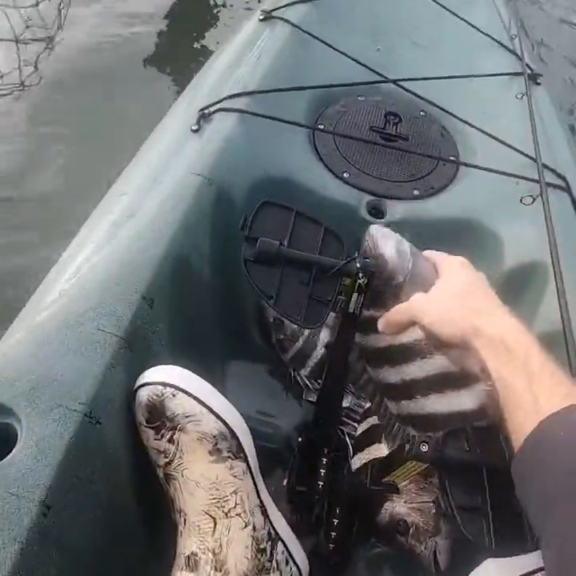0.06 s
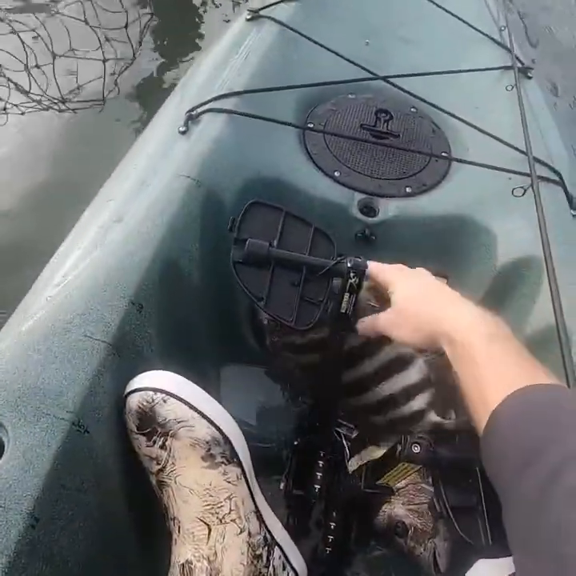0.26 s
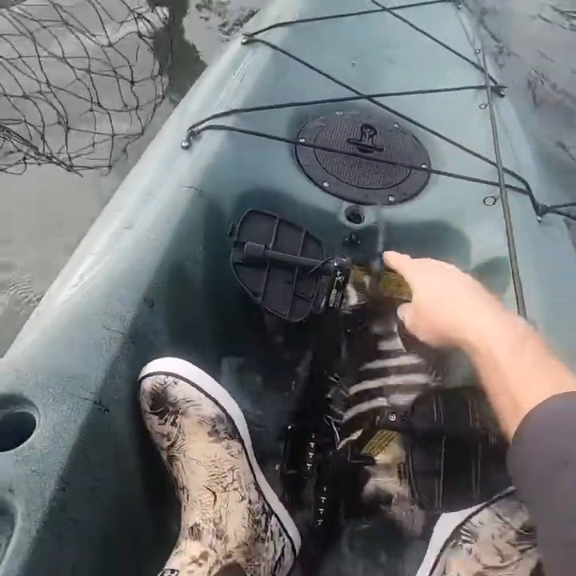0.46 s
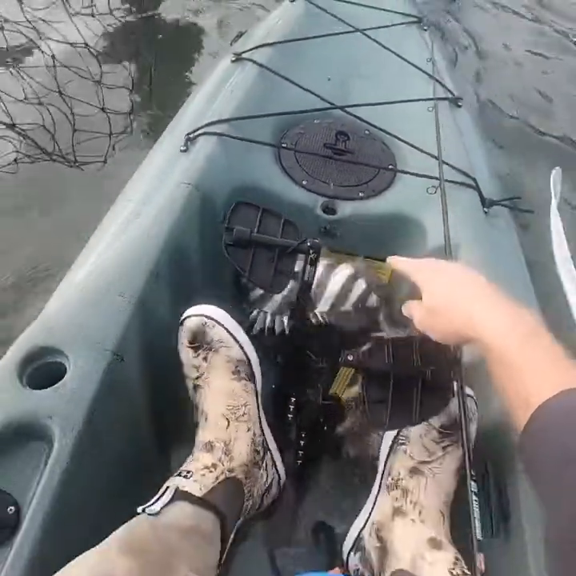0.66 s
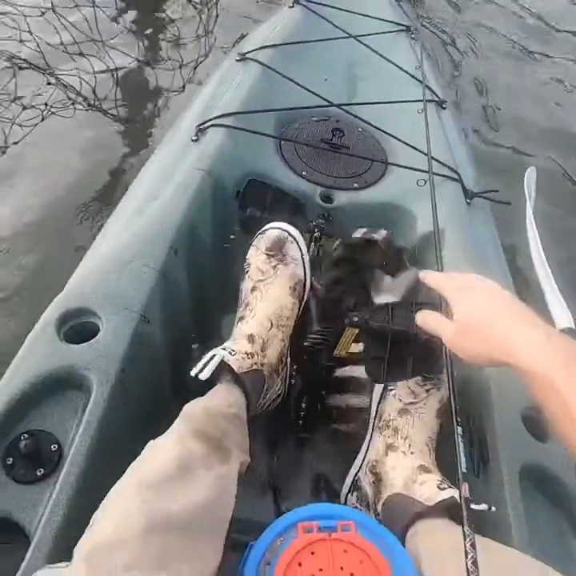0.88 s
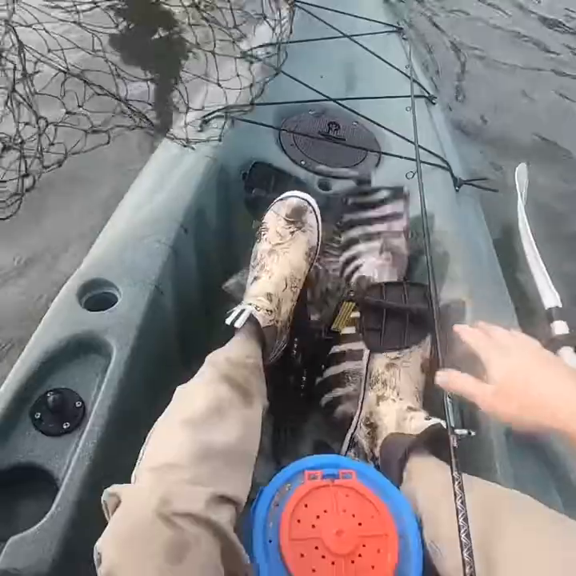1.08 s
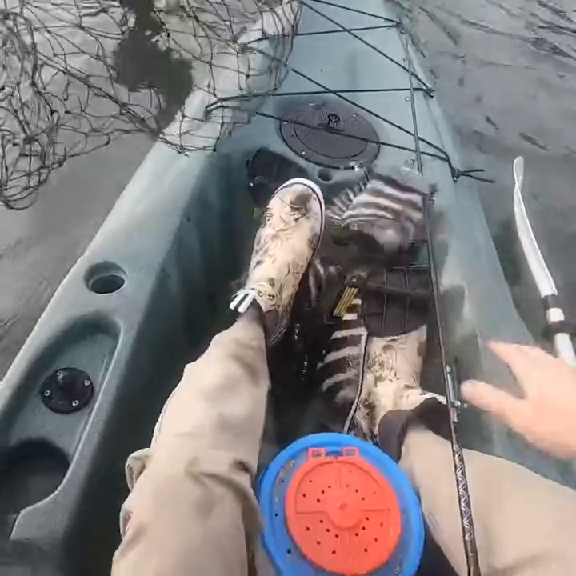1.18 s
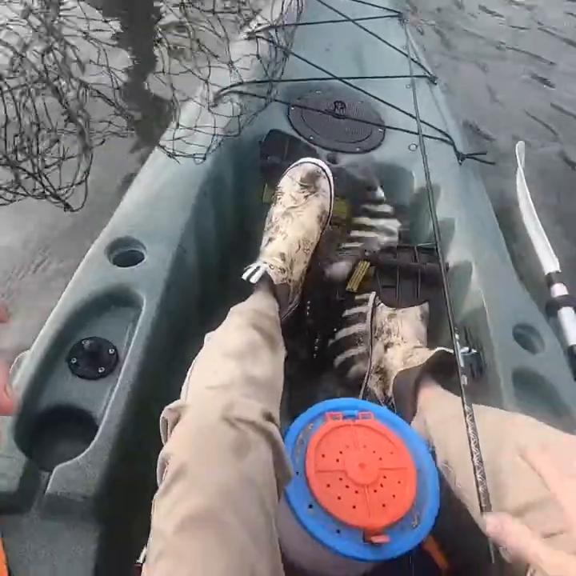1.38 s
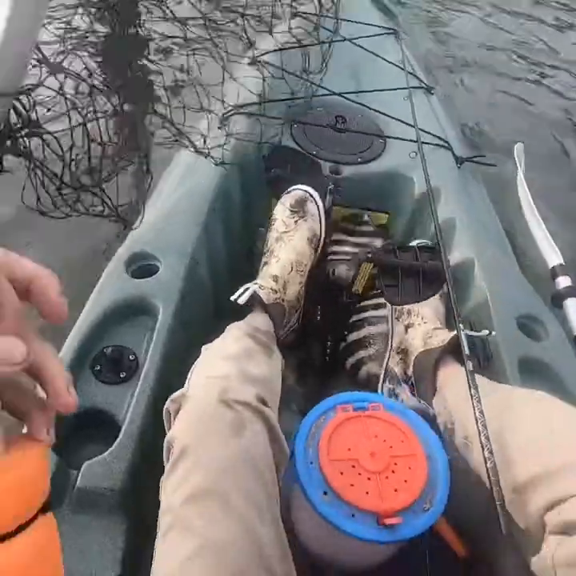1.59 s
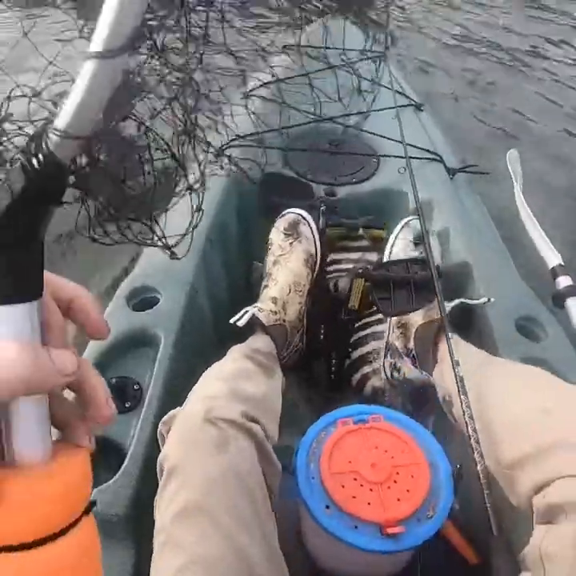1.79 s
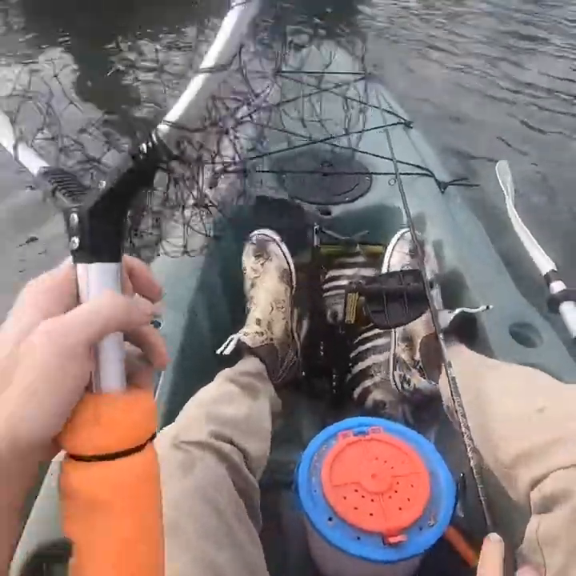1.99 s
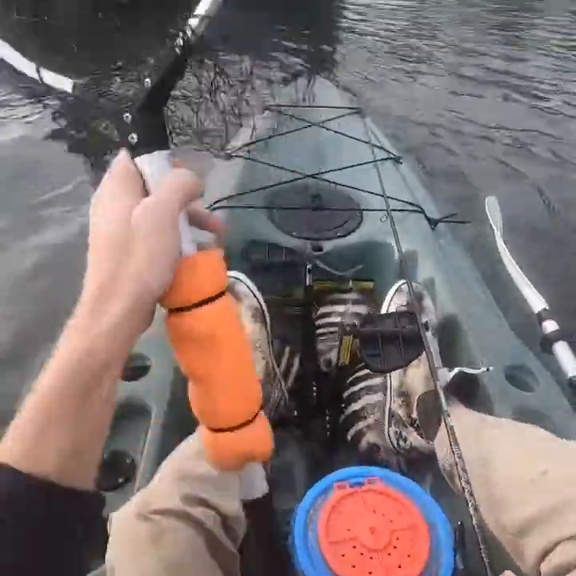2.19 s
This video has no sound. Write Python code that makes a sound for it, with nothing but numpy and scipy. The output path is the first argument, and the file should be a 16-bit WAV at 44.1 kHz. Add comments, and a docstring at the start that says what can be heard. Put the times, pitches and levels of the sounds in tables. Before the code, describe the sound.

Fish thrashing in a plastic kayak footwell, dull hollow knocks and wet slapping, then near quiet

```python
"""Footwell of a hollow plastic kayak: a fish flaps under a chest-worn camera with two close microphones.
Thumps are short shudders that ring the hull modes; slaps of fins and tail are gritty coloured noise bursts.
Droplets pop as tones of a few cycles; dense random bumps and band-passed clicks make the rumble and wet rustle.
Filtered noise makes a light wind on the microphones and a soft hiss of open water."""
import sys
import numpy as np
from scipy import signal
from scipy.fft import rfft, irfft
from scipy.io import wavfile
from scipy.ndimage import uniform_filter1d

SR = 44100
rng = np.random.default_rng(int(sys.argv[2]) if len(sys.argv) > 2 else 0)


def undo_db(level):
    """Turn decibels back into plain size, where 20 dB means ten times bigger."""
    steps = np.asarray(level, float) / 20
    return 10 ** steps


def generate_wav(signal):
    """Clip the signal to [-1, 1] and save it as 16-bit WAV at the path in sys.argv[1]."""
    frames = np.transpose(np.atleast_2d(signal))
    scaled = np.clip(frames, -1, 1) * 32767
    pcm = np.round(scaled).astype(np.int16)
    wavfile.write(sys.argv[1], SR, pcm)


N = 99225


def unit(x):
    """Scale to rms 1."""
    return x / np.sqrt(np.mean(x ** 2))


def colour(x, points, count=1024):
    """Minimum-phase filter through (hz, db) points, built from the folded cepstrum."""
    hz, db = np.array(points, float).T
    grid_hz = np.fft.rfftfreq(2 * count, 1 / SR)
    grid_db = np.interp(np.log(grid_hz + 1), np.log(hz), db)
    cepstrum = irfft(np.log(undo_db(grid_db)))
    cepstrum[1:count] *= 2
    response = np.exp(rfft(cepstrum[:count], 2 * count))
    fade = np.hanning(2 * count)[count:]
    taps = irfft(response)[:count] * fade
    return signal.fftconvolve(x, taps)[:len(x)]


def resonate(x, hz, q):
    """A steep resonance: the same band-pass twice."""
    b, a = signal.iirpeak(hz, q, SR)
    return signal.lfilter(b, a, signal.lfilter(b, a, x))


def curve(table, index):
    """Gain along time from a dB column; column 0 is time in s."""
    rows = np.array(table, float)
    return undo_db(np.interp(np.arange(N) / SR, rows[:, 0], rows[:, index]))


def walk(rate_hz):
    """Random levels held 1 / rate_hz and slewed twice; spread near 1."""
    hold = int(SR / rate_hz)
    steps = np.repeat(rng.standard_normal(N // hold + 1), hold)
    return 1.3 * uniform_filter1d(uniform_filter1d(steps, hold), hold)[:N]


def grains(per_s, spread_db):
    """Random clicks of either sign, mostly small, a few large."""
    chance, sign, size = rng.random((3, N))
    level = undo_db(-spread_db * np.log(size + 1e-9))
    return (chance < per_s / SR) * np.sign(sign - .5) * level


def add(out, at_s, x):
    """Mix x into out from time at_s."""
    i = int(at_s * SR)
    out[i:i + len(x)] += x[:N - i]


def ring(centre_hz, octaves):
    """Impulse response of the hull: decaying modes, favoured near centre_hz by the struck spot."""
    # hull modes: mode_hz, level_db, t60_s
    hull_modes = [(88, -1, 0.24), (140, 5, 0.13), (174, 4.5, 0.11), (223.9, 5.5, 0.084), (279, 4, 0.053),
                  (339.5, 1, 0.082), (378.3, -4, 0.12), (503.4, -5.5, 0.067), (593.6, -2.5, 0.035),
                  (756, -5.5, 0.021)]
    t = np.arange(SR // 2) / SR
    hz, db, t60_s = np.array(hull_modes, float).T[:, :, None]
    wake = undo_db(db) * np.exp(-(np.log2(hz / centre_hz) / octaves) ** 2)
    decay = np.exp(-np.log(1000) * t / t60_s)
    return np.sum(wake * np.sin(2 * np.pi * hz * t) * decay, axis=0)


def thumps():
    """A soft body shudders against the shell while contact lasts; the modes ring on."""
    # thumps of the fish on the hull: start_s, peak_db (before the crack), shudder_hz, contact_s
    blows = [(0.22, -27.5, 192, 0.028), (.277, -2, 257.5, 0.012), (0.3, -18.5, 203, 0.017),
             (.351, -12.5, 224, 0.015), (0.427, -3.5, 398, 0.0053), (0.432, -5.5, 119, 0.0043),
             (0.523, -4, 162, 0.0072), (0.544, 0.5, 217.5, 0.007), (0.565, -15.5, 162, 0.023),
             (0.645, -19.5, 319, 0.018), (.72, -20, 146, 0.025), (0.781, -16.5, 302, 0.017),
             (0.834, -13, 176, 0.013), (.888, -2.5, 255, 0.0094), (0.907, -22.5, 392, 0.019),
             (.966, -3, 261, 0.0072), (0.976, -12, 140, 0.021), (1.226, -25.5, 397, 0.0089),
             (1.251, -19, 236, 0.017), (1.366, -2, 257, 0.0087), (1.418, -18.5, 764, 0.0038),
             (1.459, -11.5, 213, 0.0079), (1.431, -28.5, 483, 0.0091), (2.002, -25, 312, 0.0035),
             (1.565, -7.5, 263, 0.0068), (2.173, -25.5, 150, 0.0085)]
    struck_octaves = 0.83
    crack_hz, crack_octaves, crack_db = 640, 0.67, -11  # crack_db is relative to the blow
    out = np.zeros(N)
    # first hard touch wakes the upper modes
    crack = np.convolve(ring(crack_hz, crack_octaves), np.hanning(SR // 1500))
    for start_s, peak_db, hz, contact_s in blows:
        t = np.arange(0, max(contact_s, 1e-3), 1 / SR)
        push = np.cos(2 * np.pi * hz * t) * np.sin(np.pi * t / t[-1])
        thump = np.convolve(ring(hz, struck_octaves), push - push.mean())
        add(out, start_s, undo_db(peak_db) * thump / np.abs(thump).max())
        add(out, start_s, -undo_db(peak_db + crack_db) * crack / np.abs(crack).max())
    return out


def scratches():
    """Wet slaps: gritty broad bursts that swell and die, each with its own dull part and brightness."""
    # slaps of fins and tail: swell_end_s, peak_db, dull_db, treble_db
    slaps = [(.177, -38, -12, -28), (0.237, -13, 0, -16.5), (.256, -23.5, -15, -7), (.268, -16.5, -13, -12),
             (0.291, -16, -11.5, -9), (0.332, -15, 11, -36), (.356, -18, 25, -32), (.386, -25, -3, 4),
             (0.41, -23, -18, -1), (.43, -16.5, 8, -24), (.463, -15.5, -1, -12), (.476, -10.5, -2, -4.5),
             (0.498, -14, -23, 6), (0.516, -17.5, -17, -1), (0.543, -19.5, 3, -3), (0.566, -19.5, -10, -6),
             (0.609, -19, -17, -5.5), (.626, -15, -15, -10), (.648, -9.5, 6, -16), (.788, -18, 0.5, -23),
             (0.837, -24.5, -14, 6), (0.865, -24, -13, -8), (.891, -20, -11, -7), (.94, -25, -6, -15),
             (0.954, -27, -12, -2), (1.09, -24, 6.5, -44), (1.159, -29, -19, -11), (1.189, -24, -25, -13),
             (1.211, -21.5, -2, -16), (1.239, -29, -3, -12), (1.254, -29, 1, 2), (1.267, -28, -8, -12),
             (1.293, -37, -10, 0), (1.308, -35, 12, -23), (1.321, -27, 0, -9), (1.348, -27, 1, -14),
             (1.368, -24.5, -12, -12), (1.399, -27.5, 7, -15), (1.416, -24.5, 12, -23),
             (1.445, -34.5, -7, -6), (1.525, -35.5, -16, -17), (1.577, -26.5, 16, -15.5),
             (1.608, -33, 3.5, -26), (1.814, -37, -23, -25), (2.002, -26.5, 8.5, -52),
             (2.034, -31, 17, -42)]
    # colour of a slap below the treble: freq_hz, level_db (per Hz)
    body_colour = [(500, -18.5), (1500, 3.5), (3200, 0.5), (4400, -5), (5600, -43.5)]
    # colour of its treble: freq_hz, level_db (per Hz)
    treble_colour = [(3000, 5), (4500, 2.5), (7000, -2), (10000, -9), (15500, -27)]
    swell_s, tail_s, grit_db = .005, .005, 3
    dull_hz, tint_hz, tint_db = 887, 3180, -2.5
    out, t = np.zeros(N), np.arange(2048) / SR
    noise = rng.standard_normal((len(slaps), 6, len(t)))
    swell = np.sin(np.pi / 2 * t / swell_s) ** 2
    env = np.where(t < swell_s, swell, np.exp(-(t - swell_s) / tail_s))
    for (swell_end_s, peak_db, dull_db, treble_db), row in zip(slaps, noise):
        grit = undo_db(grit_db * uniform_filter1d(row[3:], size=36) * 6)  # 6 restores unit spread
        body, dull, treble = env * row[:3] * grit
        x = unit(colour(body, body_colour, count=256))
        x = x + undo_db(dull_db) * unit(resonate(dull, dull_hz, 1))
        # chance pitch within half an octave of tint_hz
        pitch_hz = tint_hz * 2 ** (np.tanh(row[0, 0]) / 2)
        x = x + undo_db(tint_db) * unit(resonate(body, pitch_hz, 4))
        x = unit(x) + undo_db(treble_db) * unit(colour(treble, treble_colour, count=256))
        add(out, swell_end_s - swell_s, undo_db(peak_db) * x / np.abs(x).max())
    return out


def pops():
    """Droplets and bubbles: unsteady tones of a few cycles, more cycles for higher pitch by the root."""
    # pops: centre_s, level_db, pitch_hz
    droplets = [(.268, -28, 3880), (0.713, -22, 1160), (.812, -21, 1646), (1.034, -38, 2120),
                (1.158, -29.5, 3020), (1.355, -27.5, 1186), (2.174, -39, 1700)]
    cycles_at_1khz = 9.04
    out = np.zeros(N)
    for (centre_s, level_db, hz), row in zip(droplets, rng.standard_normal((len(droplets), 512))):
        t = np.arange(0, cycles_at_1khz / np.sqrt(1000 * hz), 1 / SR)
        tone = np.sin(2 * np.pi * hz * t)
        rough = .4 * unit(resonate(row, hz, 2))[:len(t)]
        add(out, centre_s - t[-1] / 2, undo_db(level_db) * (tone + rough) * np.hanning(len(t)))
    return out


def struggle():
    """Between the clear blows, small bumps keep the hull rumbling; wet grains of many pitches tick and flicker."""
    # how hard the fish struggles: time_s, rumble_db, rustle_db
    effort = [(0, -39, -48.5), (.2, -34.5, -47.5), (.24, -25, -29), (.37, -26.5, -36), (.46, -23, -27),
              (.59, -27, -31.5), (.66, -27, -28), (.76, -25.5, -30.5), (.95, -24.5, -29.5),
              (1., -29.5, -43), (1.13, -44, -41.5), (1.25, -35.5, -38), (1.44, -42.5, -40.5),
              (1.5, -33.5, -44.5), (1.65, -34, -52.5), (1.9, -51.5, -55), (2.25, -37.5, -47)]
    # colour of the wet rustle: freq_hz, level_db (per Hz)
    rustle_colour = [(240, 30), (400, 4.5), (972, -7.5), (1380, -8), (3700, -15.5), (4840, -24.5),
                     (10100, -40), (15500, -40)]
    bumps_per_s, bump_spread_db = 900, 1.5
    ticks_per_s, tick_spread_db = 1300, 2.6  # per band
    band_q, flicker_db = 4., 3.
    bumps = signal.fftconvolve(grains(bumps_per_s, bump_spread_db), ring(160.0, 1.72))[:N]
    shared = walk(45.33) + 0.96 * walk(170)  # slower swells and quick ticks, common to all bands
    wet = 0
    for hz in 450 * 2 ** np.arange(0, 5.1, 1 / 3):
        ticks = grains(ticks_per_s, tick_spread_db) * undo_db(flicker_db * walk(70))
        wet = wet + np.sqrt(hz) * unit(resonate(ticks, hz, band_q))  # even power per Hz
    wet = colour(wet * undo_db(2 * shared), rustle_colour)
    return curve(effort, index=1) * unit(bumps) + curve(effort, index=2) * unit(wet)


def wind():
    """Low buffeting on the microphones: dark noise that flutters under a gust curve."""
    # gusts: time_s, level_db
    gusts = [(0, -57), (.25, -51), (.7, -27.5), (1.1, -31.5), (1.3, -38.5), (1.6, -36.5), (2.02, -34),
             (2.25, -37.5)]
    # colour of the wind: freq_hz, level_db (per Hz)
    wind_colour = [(40, -5.5), (70, 1.5), (130, -6.5), (250, -13.5), (500, -27.5), (1000, -70)]
    x = colour(rng.standard_normal(N), wind_colour, count=8192) * undo_db(0.85 * walk(15.25))
    return curve(gusts, index=1) * unit(x)


def water():
    """Open water: soft hiss, nearly steady."""
    # colour of the hiss: freq_hz, level_db (per Hz)
    water_colour = [(200, 6), (400, -9), (900, -1), (2000, -18.5), (4500, -32), (12000, -85)]
    level_db = -51.5
    hiss = colour(rng.standard_normal(N), water_colour) * undo_db(0.47 * walk(7.7))
    return undo_db(level_db) * unit(hiss)


def scene():
    """All sources are nearly alike in both channels; a faint smeared difference, mostly treble, and some wind differ."""
    # smeared difference between the channels: freq_hz, side_under_mid_db
    side_colour = [(150, -47), (1500, -44.5), (12000, -15.5)]
    # wind that differs between the microphones: time_s, level_db (re shared wind)
    side_wind = [(1.6, -70), (1.7, -13.5), (2.25, -5.5)]
    mid = thumps() + scratches() + pops() + struggle() + wind() + water()
    smear = rng.standard_normal(400) * np.exp(-np.arange(400) / 90.)
    smeared = np.convolve(mid, smear / np.linalg.norm(smear))[:N]
    side = colour(smeared, side_colour) + curve(side_wind, index=1) * wind()
    return np.array([mid + side, mid - side])


def roll_off(x):
    """The treble ends steeply here."""
    return signal.sosfilt(signal.butter(12, 15720, fs=SR, output="sos"), x)


def record(dry):
    """The housing dulls the top; the camera rounds the loudest peaks and cuts the top."""
    # housing response: freq_hz, level_db
    housing = [(10300, 0.5), (15000, -7), (16000, -14)]
    limit, top_hz = 1.5, 15750  # limit re full scale
    x = np.array([colour(channel, housing, count=256) for channel in dry])
    x = limit * np.tanh(x / limit)
    low_pass = signal.ellip(8, .2, 70, top_hz, fs=SR, output="sos")
    mix = signal.sosfilt(low_pass, x)
    return roll_off(mix)


dry = scene()
out = record(dry)
generate_wav(out)
```